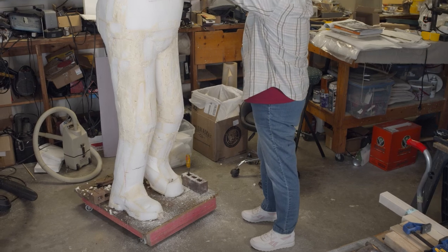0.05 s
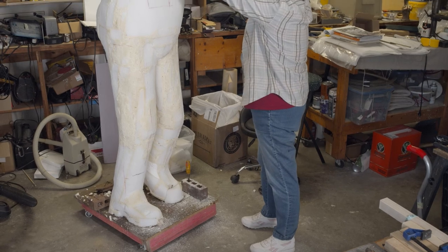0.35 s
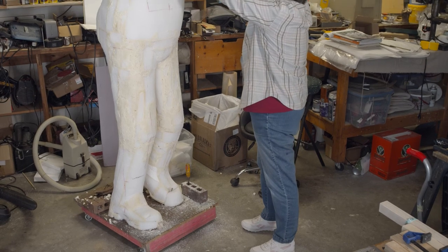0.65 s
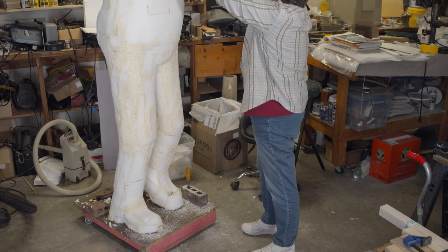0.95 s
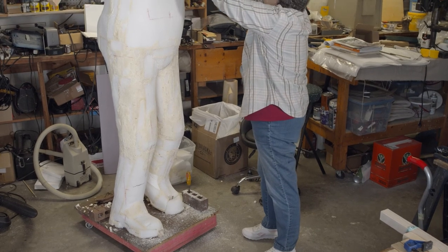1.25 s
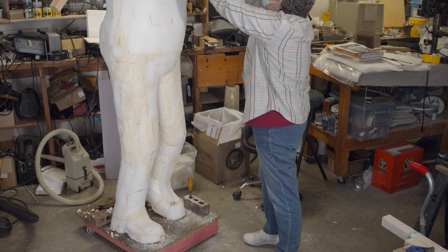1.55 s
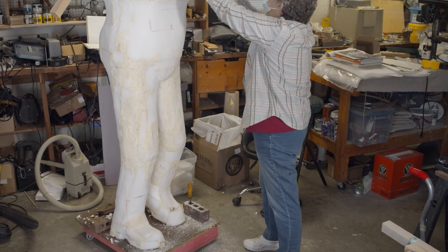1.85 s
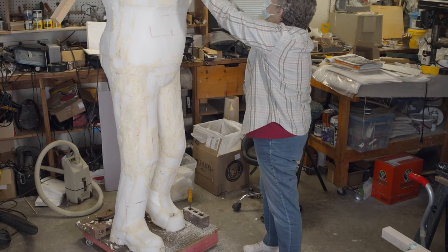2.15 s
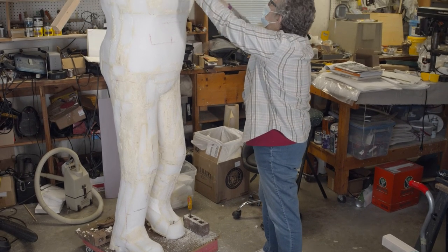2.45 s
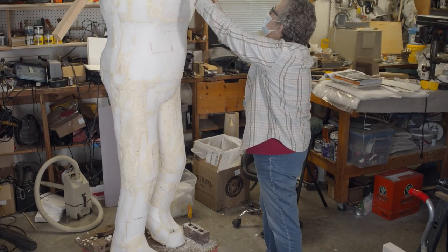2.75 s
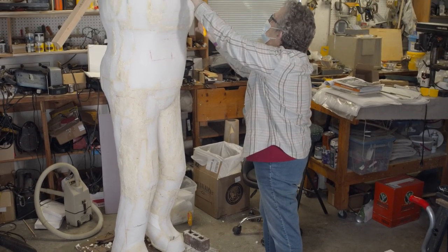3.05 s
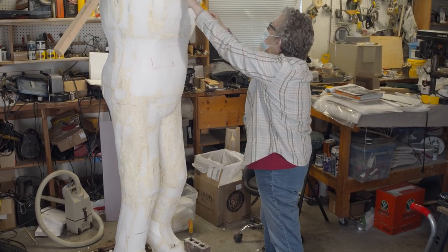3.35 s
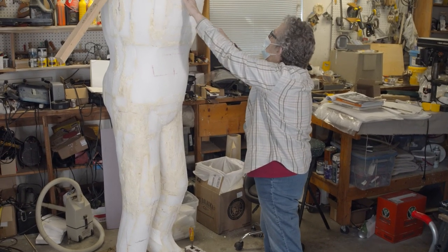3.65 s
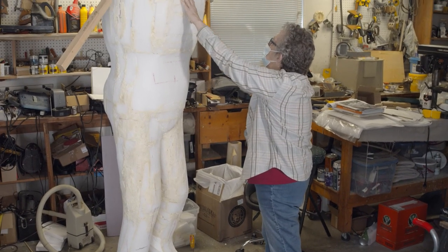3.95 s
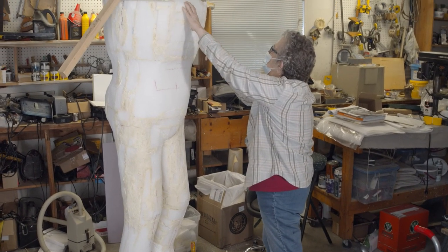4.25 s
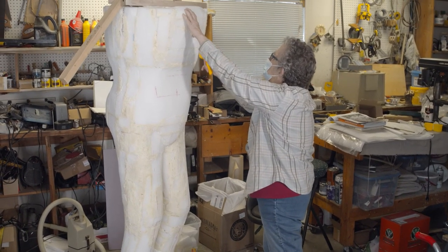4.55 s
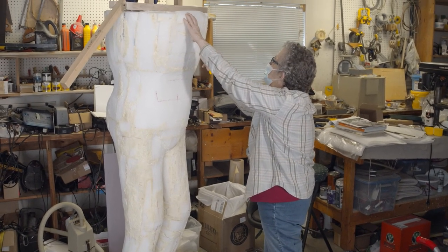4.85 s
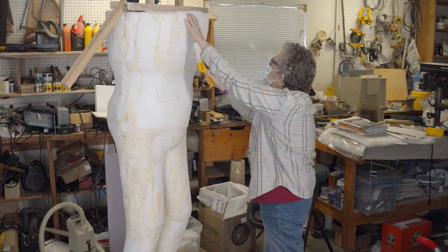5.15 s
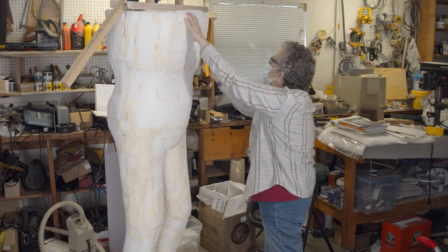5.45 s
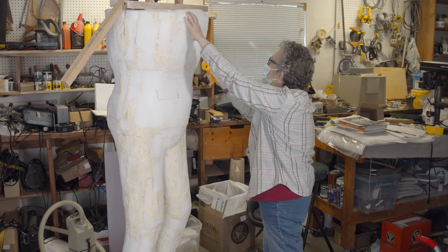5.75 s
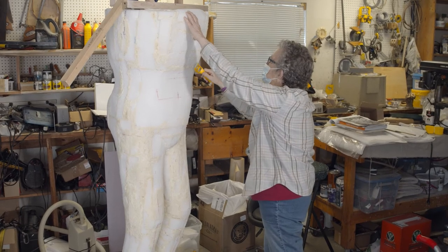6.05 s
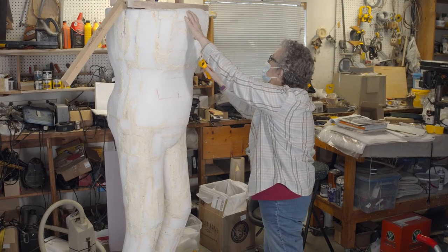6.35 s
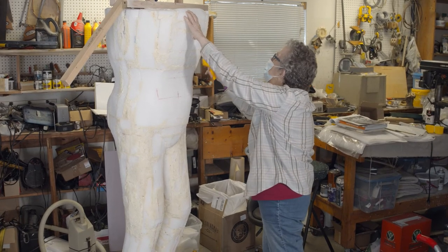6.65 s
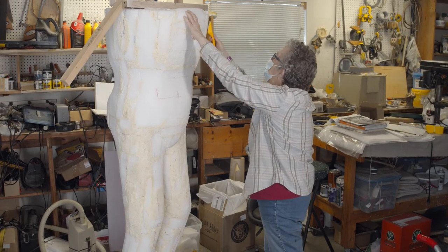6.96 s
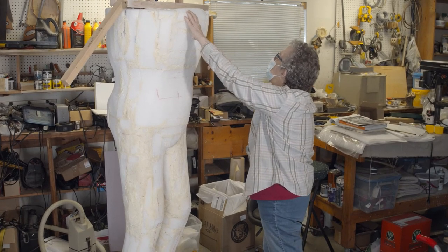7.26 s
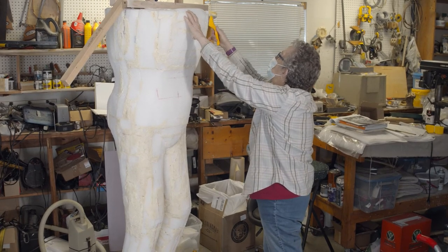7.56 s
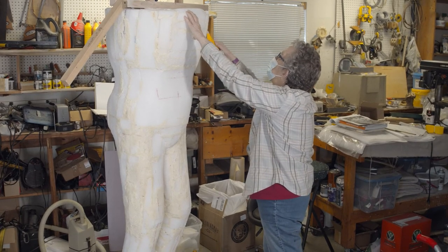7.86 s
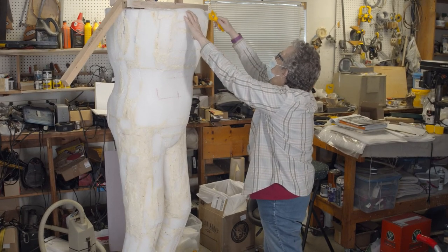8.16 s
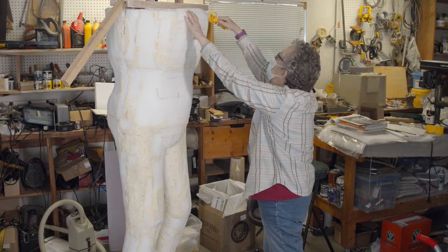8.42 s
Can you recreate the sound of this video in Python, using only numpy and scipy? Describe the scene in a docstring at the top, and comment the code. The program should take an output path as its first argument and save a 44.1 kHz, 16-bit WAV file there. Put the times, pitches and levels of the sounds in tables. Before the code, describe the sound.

A hand rasp scrapes a foam sculpture in even, scratchy strokes, about two a second, over a low workshop rumble.

```python
"""A hand rasp shapes a tall foam sculpture in a cluttered workshop, about two strokes a second.
Each stroke lands with a light tap, then swells and eases as the teeth tear foam cells: dense snaps
that ring the block. Now and then the teeth catch, a crumb breaks off or the blade squeaks.
The room answers briefly; one microphone hears it over a low rumble, a faint hum and a fainter whine."""
import sys
import numpy as np
from scipy import signal
from scipy.fft import rfft, irfft, next_fast_len
from scipy.io import wavfile
from scipy.ndimage import uniform_filter1d, map_coordinates

SR = 44100
rng = np.random.default_rng(int(sys.argv[2]) if len(sys.argv) > 2 else 0)


def master_out(mix):
    """Clip the mix to full scale and print it as 16-bit PCM to the path in sys.argv[1]."""
    frames = np.transpose(np.atleast_2d(mix))
    ceiling = np.clip(frames, -1, 1)
    pcm = np.round(ceiling * 32767).astype(np.int16)
    wavfile.write(sys.argv[1], SR, pcm)


N = 374409
HZ = np.fft.rfftfreq(16384, 1 / SR)


# pushes of the rasp; lean > 0 stresses the end:
# (start [s], length [s], force [dB], lean [dB], arch [dB], spot ring [dB], flexing foam lip [Hz])
STROKE_PUSHES = [ (-.102, 0.14, -32, -3.5, 3.5, 7, 590), (0.39, 0.11, -33.5, 1.5, 3.5, 3, 864),
                 (.81, 0.18, -35.5, -4, 5.5, 3, 4230), (1.301, 0.19, -35.5, -2.1, .5, -1.5, 850),
                 (1.814, 0.23, -35, 4.5, 6, -4.5, 940), (2.377, 0.25, -36, 0.5, 3.5, -2, 470),
                 (2.967, 0.21, -34.5, -2, 2, -0.5, 670), (3.496, 0.19, -30.5, -6.5, 8.5, 0.5, 3800),
                 (4.03, 0.19, -31, -4.5, 6, 0.5, 2780), (4.529, 0.18, -26, 1, 6, 3, 2320),
                 (5.067, 0.18, -25.5, -.5, 6, 5.5, 2075), (5.559, 0.19, -28, -2, 4.5, 6.5, 4250),
                 (6.078, 0.17, -33.5, -3.5, 1, 6, 2000), (6.546, .13, -34, -5, -1, 8.5, 388),
                 (7.105, 0.22, -28, 13.5, 11.5, 0.5, 2250), (7.742, 0.18, -33, 7, 3.5, 2, 730),
                 (8.383, 0.18, -37, -3.5, 9.5, 4, 890), ]

def rasp(clump_db, unsteady_db, rub_db, low_db, grit_db, grit_db_per_db, split_hz):
    """Teeth tear cells in clumps; pressing harder drives the block more than the grit above split_hz."""
    out = np.zeros(N)
    lowpass = signal.butter(1, split_hz, fs=SR, output="sos")
    for start_s, length_s, force_db, lean_db, arch_db, ring_db, lip_hz in STROKE_PUSHES:
        touchdown_s = max((row[0] for row in TOUCHDOWNS if row[0] < start_s), default=0)
        t = np.arange(touchdown_s, start_s + length_s + 0.1, 1 / SR)
        press_db = stroke_force(t, start_s, length_s, force_db, lean_db, arch_db)
        press_db += unsteady_db * wobble(t, rate_hz=46.4)
        clumps = unit(amp(clump_db * wobble(t, rate_hz=260)))
        cells = snaps(t, rate_hz=6000, spread_db=4)
        tearing = clumps * unit(cells + amp(rub_db) * rng.standard_normal(len(t)))
        low = signal.sosfiltfilt(lowpass, tearing)
        grit = tearing - low
        drive = amp(press_db + low_db) * low + amp(grit_db_per_db * press_db + grit_db) * grit
        colour_db = spot_colour(start_s, force_db, ring_db, lip_hz)
        # force sets the scratch band; the block's lower resonances add to it
        power = amp(colour_db) ** 2
        scratch_share = power[(HZ > 1500) & (HZ < 8000)].sum() / power.sum()
        add(out, touchdown_s, ring(drive, colour_db) / np.sqrt(scratch_share))
    return out


# the rasp briefly cuts deeper: (centre [s], half length [s], boost [dB])
DEEP_CUTS = [(1.34, 0.027, 5.5), (3.024, 0.0089, 5), (4.628, 0.03, 1), (5.22, .015, 3), (5.648, 0.012, 6),
             (5.688, 0.015, 4), (7.28, 0.01, 2)]

def stroke_force(t, start_s, length_s, force_db, lean_db, arch_db,
                 bite_db=-19.5, bite_s=0.032, lift_db_per_s=610):
    """Force in dB: the teeth bite, the arm swells and eases, the rasp may grab, the blade lifts."""
    travel = np.clip((t - start_s) / length_s, 0, 1) - 0.5
    push = force_db + lean_db * travel - arch_db * (2 * travel) ** 2
    bite = bite_db * (np.maximum(start_s - t, 0) / bite_s) ** 2
    grab = sum(db * np.exp(-((t - s) / half_s) ** 2) for s, half_s, db in DEEP_CUTS)
    lift = lift_db_per_s * np.maximum(t - start_s - length_s, 0)
    return push + bite + grab - lift


# tearing cells: (frequency [Hz], gain [dB])
TEAR_SPECTRUM = [(25, -13), (70, -6.5), (150, 0.8), (300, 3.5), (800, 3), (1500, 5), (3000, 0), (5000, -2),
                 (7500, -6), (10500, -13.5), (15300, -17)]
# resonances of the block: (centre [Hz], width [Hz], gain [dB])
FOAM_MODES = [(91, 9.4, 8.2), (174.1, 7.8, 10.6), (217.4, 16.4, 12.7), (267.3, 18.7, 9.2),
              (295.4, 9.6, 5.4), (318.7, 28.4, 9.7), (405, 21.5, 8.7), (433.6, 51.6, 9.7),
              (481.2, 14.5, 8.1), (526, 25, 7.4), (583, 31, 4.5), (594, 12, 3.2), (706, 23, 6.3),
              (942, 77, 5.6), (1003, 13, 1.07), (1051, 19, 2.5), (1122, 35, 5.3), (1206, 40, 2.7),
              (1276, 82, 2.8), (1492, 62, 5.5), (1720, 25, 1.1), (2040, 150, 1.8), (2760, 110, 2.7),
              (4030, 1500, 1.66)]
# hollow, body, ring and crisp bands: (centre [Hz], width [Hz])
TONE_BANDS = [(255, 146), (460, 460), (1150, 590), (13000, 48000)]
# tone as the rasp travels over the figure: (time [s], boom [dB], body [dB], crispness [dB])
TONE_DRIFT = [(0, 4, 8, 10), (.5, 7, 6.5, 13.5), (1.3, -5, 0, 5), (2, 6, 4.5, -9.5), (3.3, -4, -1, -16.5),
              (5, -2, -0.5, -5.5), (6.4, 2, -1, 9), (7.1, -9, 2.5, -0.5), (8.4, 1.5, 1.5, 11)]

def spot_colour(start_s, force_db, ring_db, lip_hz, lip_db=3.5, boom_hz=110, boom_width_hz=114):
    """Gain in dB of the foam under one stroke: a local lip flexes and the whole figure booms."""
    times_s, *tones = np.transpose(TONE_DRIFT)
    boom_db, body_db, crisp_db = [np.interp(start_s, times_s, tone) for tone in tones]
    hollow_db = -4 + 0.33 * (force_db + 32)  # harder pushes wake the hollow tone
    gains_db = (hollow_db, body_db, ring_db, crisp_db)
    spot_modes = [(hz, width_hz, db) for (hz, width_hz), db in zip(TONE_BANDS, gains_db)]
    spot_modes += [(lip_hz, 0.2 * lip_hz, lip_db), (boom_hz, boom_width_hz, boom_db)]
    return along(TEAR_SPECTRUM) + peaks(FOAM_MODES) + peaks(spot_modes)


def flakes(x, patchy_db):
    """Loose flakes and ridges ring for a moment, each at its own pitch."""
    spectra = signal.stft(x, nperseg=512)[2]
    patches = uniform_filter1d(rng.standard_normal(spectra.shape), size=4, axis=0)
    patches = uniform_filter1d(patches, size=6, axis=1)
    return signal.istft(spectra * amp(patchy_db * unit(patches)), nperseg=512)[1][:N]


# short crunches: (time [s], relative level [dB])
CRUNCHES = [(.391, -19), (0.803, -20.5), (2.961, -23), (3.026, -14.5), (3.517, -19), (3.683, -15),
            (4.026, -20), (4.51, -11.5), (5.038, -19), (5.559, -13), (6.062, -26), (6.544, -11),
            (8.381, -24)]

def catches(gain_db, t60_s):
    """The teeth dig in and a row of cells gives way at once."""
    out, t = np.zeros(N), np.arange(SR // 12) / SR
    for s, db in CRUNCHES:
        burst = snaps(t, rate_hz=3500, spread_db=3) * amp(-60 * t / t60_s)
        add(out, s, amp(db + gain_db) * ring(burst, along(TEAR_SPECTRUM) + peaks(FOAM_MODES)))
    return out


# the rasp lands: (time [s], relative level [dB], thud offset [dB], rise [s], skid t60 [s])
TOUCHDOWNS = [(.295, -40, -23, 0.0046, .2), (.744, -34.5, -10, .002, 0.085), (1.244, -31, -12, .002, 0.059),
              (1.792, -25, -15, 0.00037, 0.033), (2.303, -41, -9, 0.0023, .033),
              (2.913, -30.5, -10.5, 0.00074, 0.043), (3.4536, -20, -12.5, 0.00077, 0.028),
              (3.952, -42, -6.5, .002, 0.062), (4.463, -22.5, -12.5, .002, 0.035),
              (4.978, -35, -44, .002, 0.16), (5.49, -27.5, -16, 0.00067, 0.034),
              (6.03, -35.5, -17.5, 0.00089, 0.06), (6.486, -24.5, -1.5, 0.0011, 0.035),
              (6.976, -28.5, -26, 0.013, 0.35), (7.647, -35, -3.5, 0.0046, .13),
              (8.28, -39.5, -4.5, 0.005, 0.1)]
# tap of the teeth, thud of the block: (frequency [Hz], gain [dB])
TAP_SPECTRUM = [(80, -14.5), (300, -5.5), (1000, 5.5), (2000, 0.5), (2800, -4), (5000, -6.5),
                (10000, -18.5), (15000, -25)]
THUD_SPECTRUM = [(60, -43), (200, -2), (330, 2), (480, 3.5), (650, -11.5), (1200, -26), (4000, -35)]

def landings(tap_db, thud_db, thud_t60_s):
    """A tap or short skid as the teeth meet the foam, and a thud of the block."""
    out, t = np.zeros(N), np.arange(SR // 6) / SR
    block_db = 0.85 * peaks(FOAM_MODES)  # the block rings under the resting tool
    for s, db, weight_db, rise_s, skid_t60_s in TOUCHDOWNS:
        contact = 1 - np.exp(-t / rise_s)  # a glancing landing builds slowly
        skid = snaps(t, rate_hz=11000, spread_db=1) * amp(-60 * t / skid_t60_s)
        push = snaps(t, rate_hz=20000, spread_db=3) * amp(-60 * t / thud_t60_s)
        tap = ring(contact * skid, along(TAP_SPECTRUM) + block_db)
        thud = ring(contact * push, along(THUD_SPECTRUM) + block_db)
        add(out, s, amp(db + tap_db) * tap + amp(db + weight_db + thud_db) * thud)
    return out


# breaking crumbs: (time [s], level [dB])
CRUMB_BREAKS = [(5.6914, -13.5), (6.0834, -15), (6.2455, -16.5), (6.5445, -14.5)]
# one crack: (frequency [Hz], gain [dB])
CRACK_SPECTRUM = [(300, 4), (1500, -7), (6000, 8), (10000, 5.5), (15000, 2)]

def crumbs():
    """Each crumb breaks off with a single bright crack."""
    out = np.zeros(N)
    for s, db in CRUMB_BREAKS:
        add(out, s, ring([amp(db)], along(CRACK_SPECTRUM)))
    return out


# foam squeaks: (time [s], length [s], pitch [Hz], level [dB])
STICK_SLIPS = [(5.632, 0.029, 1141, -15), (5.675, 0.042, 1169, -22), (6.058, 0.054, 1108, -27)]

def squeaks(waver):
    """The blade sticks and slips on the foam at an unsteady pitch."""
    out = np.zeros(N)
    for s, length_s, hz, db in STICK_SLIPS:
        t = np.arange(0, length_s, 1 / SR)
        pitch_hz = hz * (1 + waver * wobble(t, rate_hz=209))
        phase = 2 * np.pi * np.cumsum(pitch_hz) / SR
        add(out, s, amp(db) * np.sin(np.pi * t / length_s) * np.sin(phase))
    return out


# room decay: (frequency [Hz], t60 [s])
ROOM_DECAY = [(100, 0.71), (250, 0.31), (500, 0.33), (1500, 0.31), (4000, 0.36), (8000, 0.32),
              (14000, 0.21)]

def workshop(x, wet_db, rise_s):
    """Shelves and walls answer each new tool position differently; the top treble dies first."""
    out = x.copy()
    edges = [0] + [round((row[0] - 0.005) * SR) for row in TOUCHDOWNS] + [N]
    for start, end in zip(edges, edges[1:]):
        hz, t, spectra = signal.stft(rng.standard_normal(SR * 3 // 4), SR, nperseg=256)
        decay = amp(-60 * t / along(ROOM_DECAY, hz)[:, None])
        tail = signal.istft(spectra * decay, SR, nperseg=256)[1]
        tail *= 1 - np.exp(-np.arange(len(tail)) / SR / rise_s)
        add(out, start / SR, amp(wet_db) * signal.fftconvolve(x[start:end], tail / np.linalg.norm(tail)))
    return out


# rumble and hiss: (frequency [Hz], relative density [dB])
AIR_SPECTRUM = [(20, -1), (70, -5.5), (110, -8.5), (172, -13.5), (300, -22), (600, -22), (1000, -23.5),
                (1600, -31), (2500, -34), (8800, -45.5), (15800, -45.5)]
# humming bands: (centre [Hz], width [Hz], gain [dB])
HUM_BANDS = [(84, 14.6, 9.5), (764, 25, 1.5)]
# rise of the whine: (time [s], level [dB])
WHINE_LEVELS = [(2.3, -87), (3.3, -73.5), (8.4, -74)]

def background(air_db, whine_hz):
    """Steady rumble and hiss with humming bands; a faint fuzzy whine comes up."""
    air = ring(rng.standard_normal(N + SR), along(AIR_SPECTRUM) + peaks(HUM_BANDS))[SR:][:N]
    band = signal.butter(2, [0.96 * whine_hz, 1.04 * whine_hz], "bandpass", fs=SR, output="sos")
    whine = signal.sosfilt(band, rng.standard_normal(N))
    whine_db = np.interp(np.arange(N) / SR, *np.transpose(WHINE_LEVELS))
    return amp(air_db) * unit(air) + amp(whine_db) * unit(whine)


def amp(db):
    return 10 ** (np.asarray(db) / 20)


def unit(x):
    return x / np.sqrt(np.mean(x ** 2) + 1e-20)


def along(points, hz=HZ):
    """Interpolate (frequency [Hz], value) points on a log axis."""
    knots_hz, values = np.transpose(points)
    return np.interp(np.log(hz + 1), np.log(knots_hz + 1), values)


def peaks(modes):
    """Summed gain of resonances in dB."""
    return sum(db / (1 + (2 * (HZ - hz) / width_hz) ** 2) for hz, width_hz, db in modes)


def ring(x, gain_db):
    """Pass x through a minimum-phase filter of energy 1 with this colour."""
    cepstrum = irfft(np.log(amp(gain_db) + 1e-6))
    half = len(cepstrum) // 2
    causal = 2 * cepstrum[:half] * (np.arange(half) > 0)
    kernel = irfft(np.exp(rfft(causal, len(cepstrum))))[:half]
    return signal.fftconvolve(x, kernel / np.linalg.norm(kernel))


def add(track, start_s, x):
    part = track[max(0, round(start_s * SR)):][:len(x)]
    part += x[:len(part)]


def wobble(t, rate_hz):
    """Smooth curve through random knots."""
    knots = (t - t[0]) * rate_hz
    return map_coordinates(rng.standard_normal(int(knots[-1]) + 2), [knots])


def snaps(t, rate_hz, spread_db):
    """Random impulses of uneven size, rms 1."""
    hits = rng.random(len(t)) < rate_hz / SR
    signs = np.sign(rng.standard_normal(len(t)))
    return unit(hits * signs * amp(spread_db * rng.standard_normal(len(t))))


def scene():
    """Rasping in the workshop; one microphone feeds both channels."""
    scrape = rasp(clump_db=1.45, unsteady_db=0.15, rub_db=-5.5, low_db=-0.96,
                  grit_db=-9.0, grit_db_per_db=0.84, split_hz=4200)
    work = flakes(scrape, patchy_db=1.95) + catches(gain_db=-14.5, t60_s=0.021)
    work += landings(tap_db=-6, thud_db=4.5, thud_t60_s=0.06)
    work += crumbs() + squeaks(waver=0.06)
    mono = workshop(work, wet_db=-7.0, rise_s=0.00093) + background(air_db=-56, whine_hz=1825)
    return np.array([mono, mono])


def record(dry, top_hz=15850):
    """Brick-wall low-pass."""
    size = next_fast_len(N + SR // 2)
    passband = np.fft.rfftfreq(size, 1 / SR) < top_hz
    return irfft(rfft(dry, size) * passband, size)[:, :N]


dry = scene()
out = record(dry)
master_out(out)
```